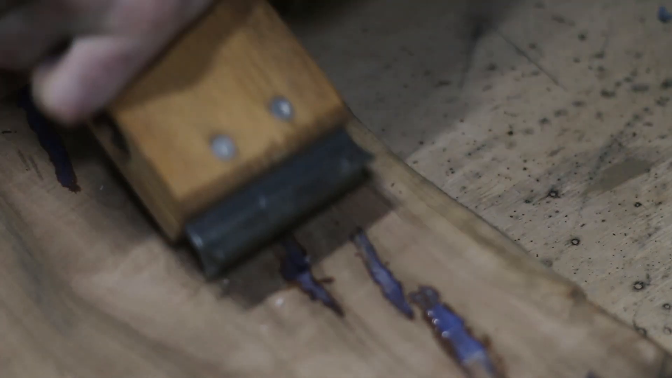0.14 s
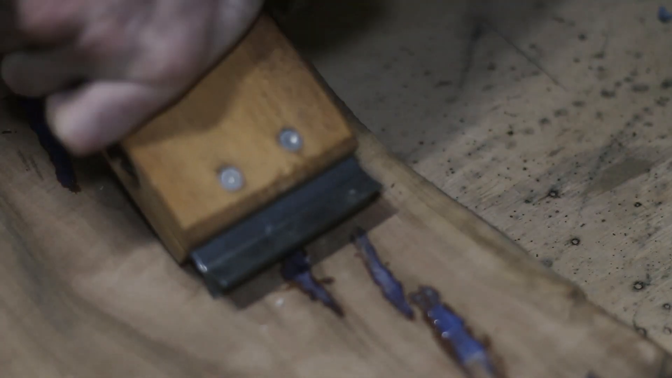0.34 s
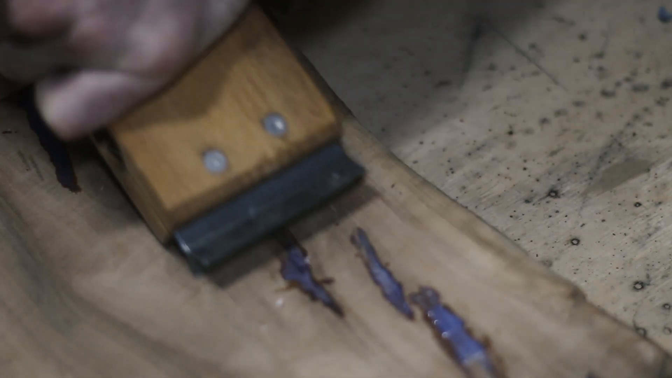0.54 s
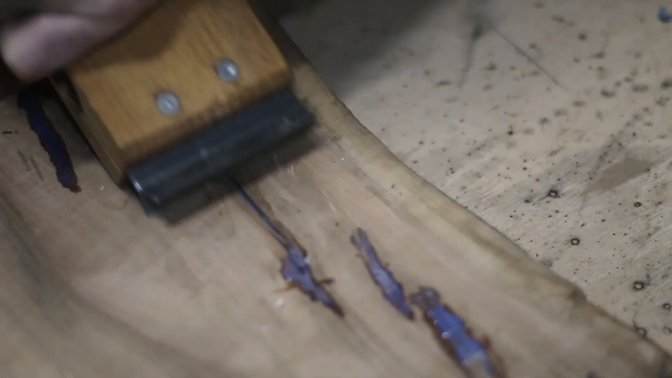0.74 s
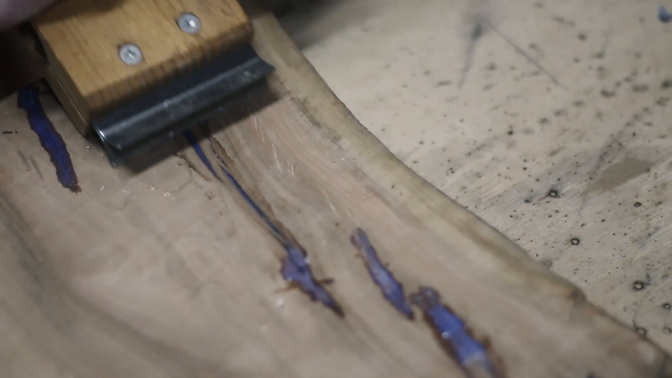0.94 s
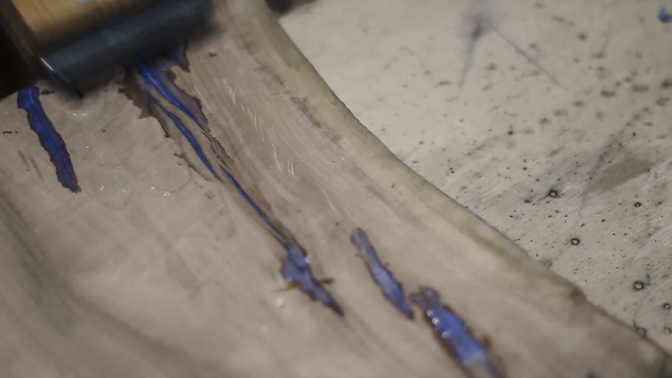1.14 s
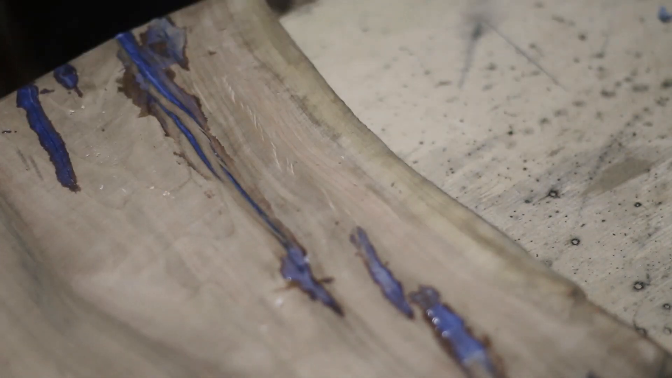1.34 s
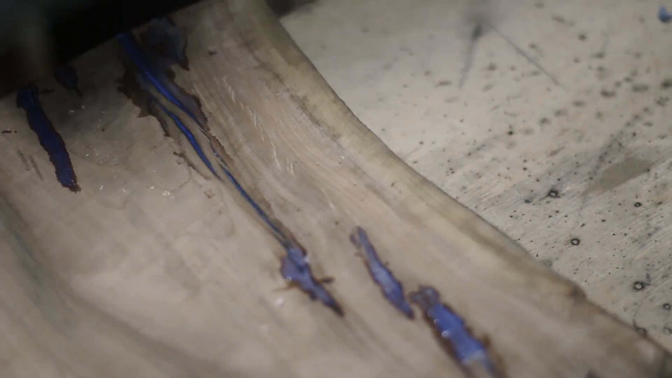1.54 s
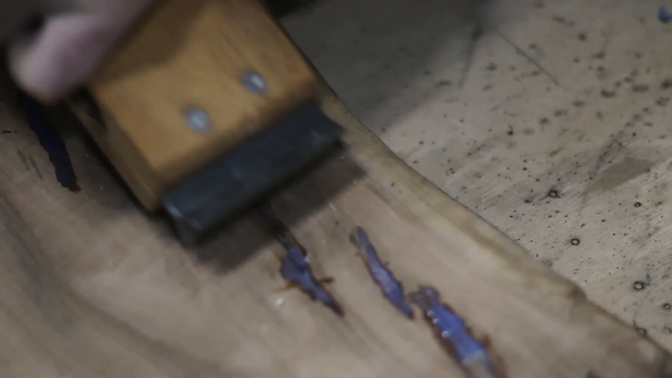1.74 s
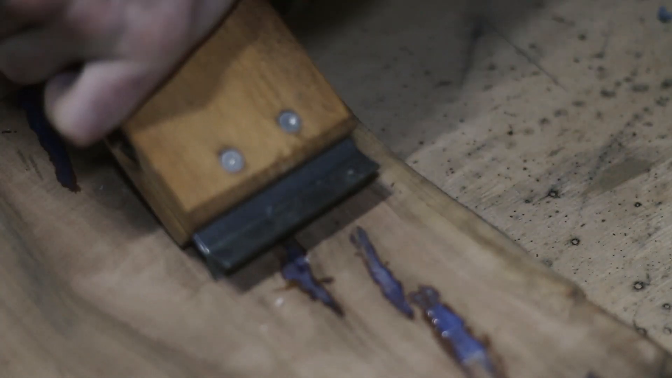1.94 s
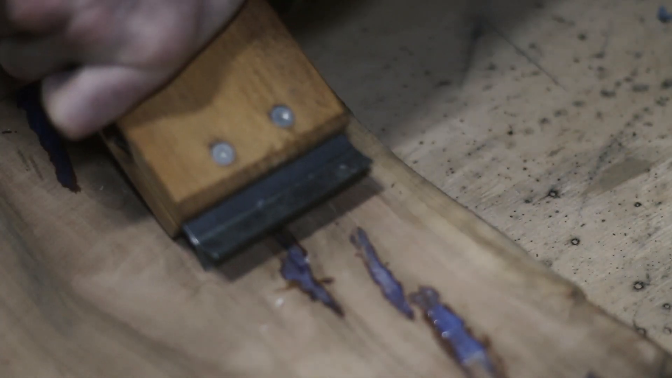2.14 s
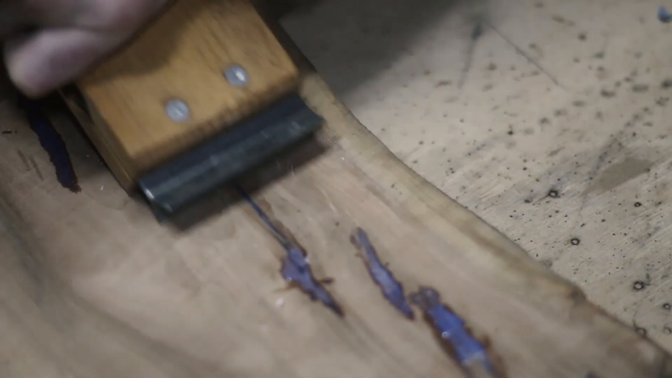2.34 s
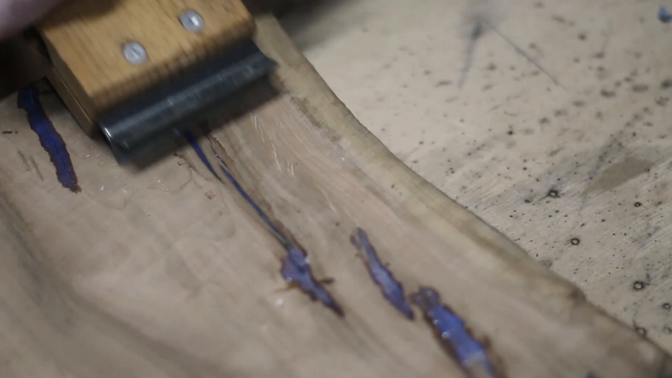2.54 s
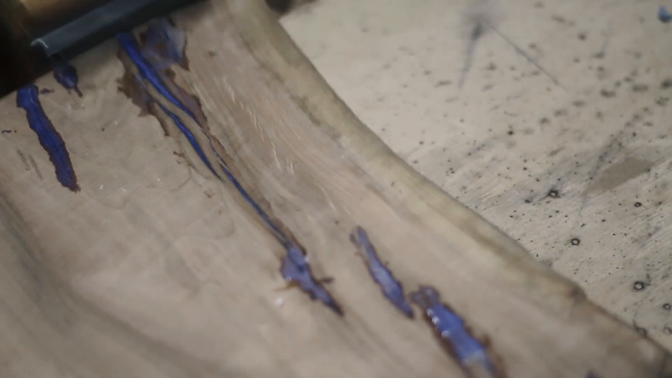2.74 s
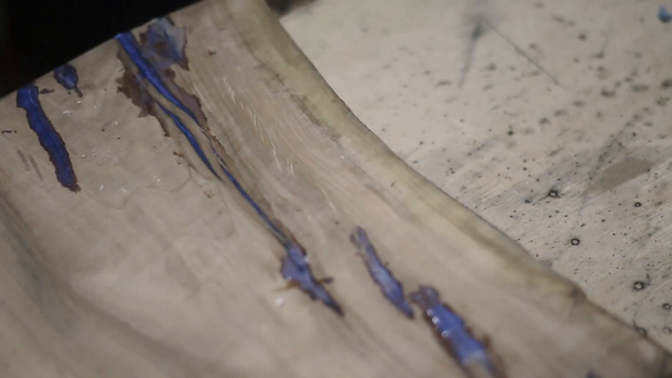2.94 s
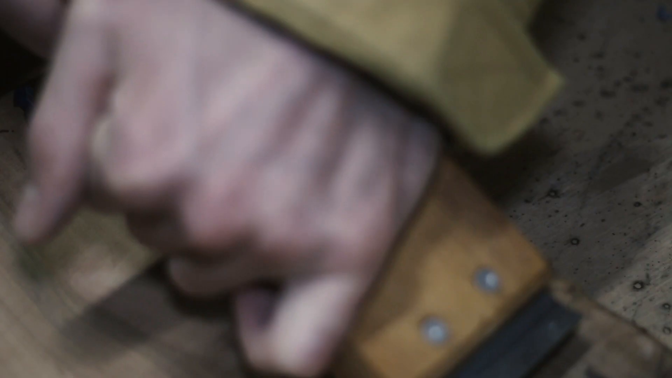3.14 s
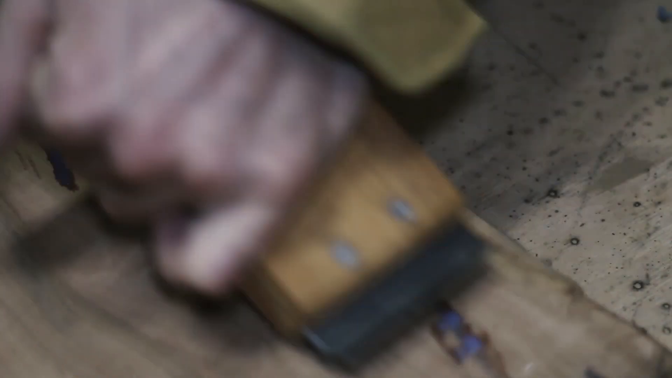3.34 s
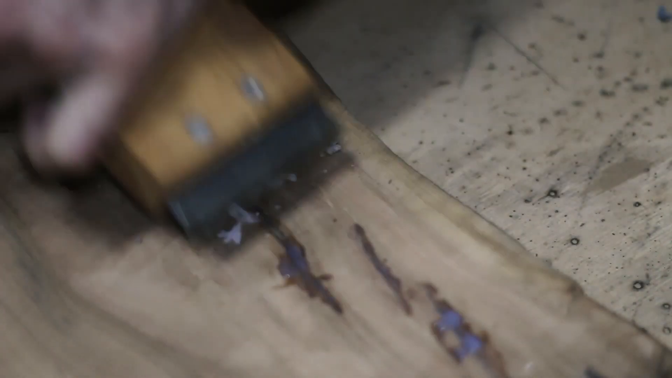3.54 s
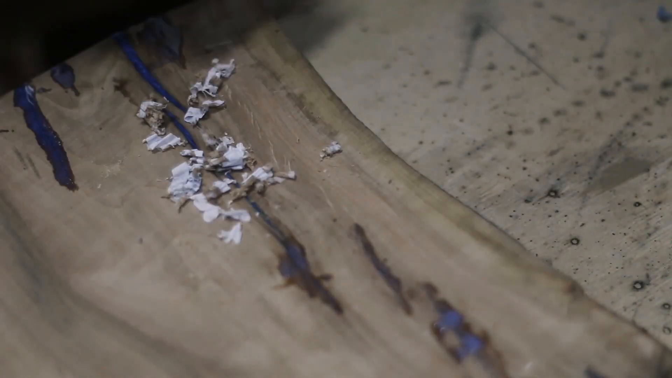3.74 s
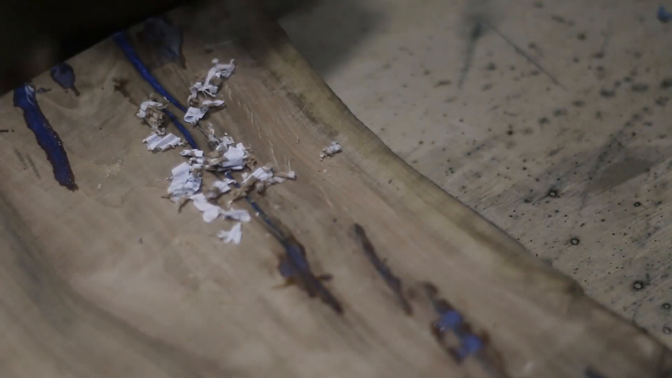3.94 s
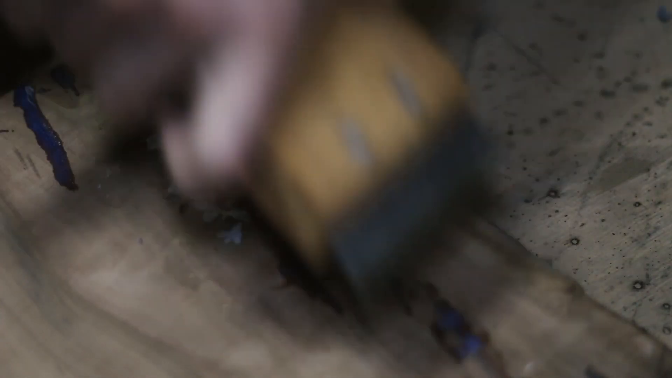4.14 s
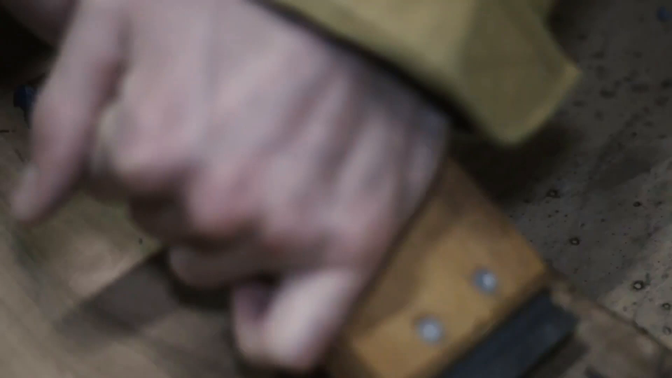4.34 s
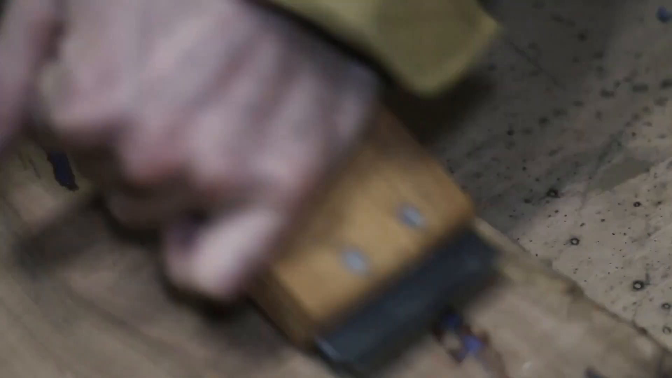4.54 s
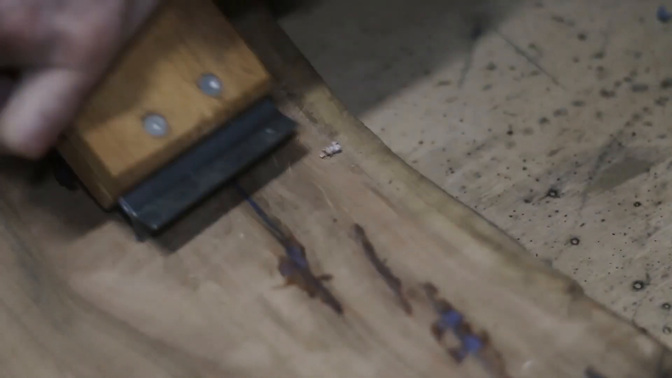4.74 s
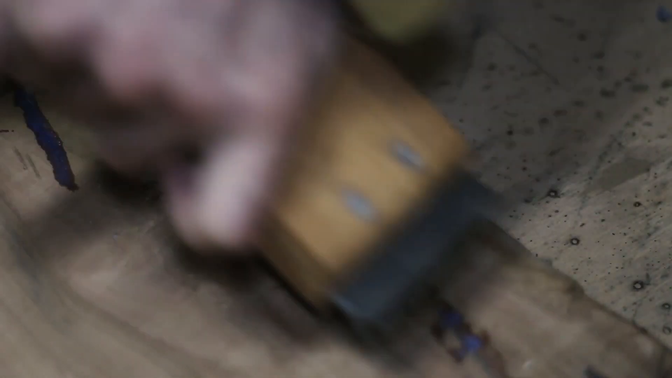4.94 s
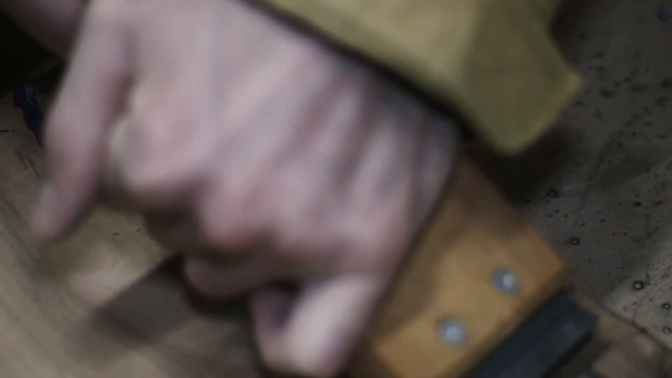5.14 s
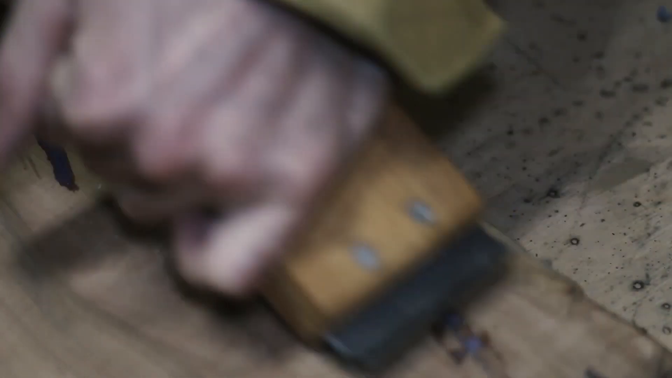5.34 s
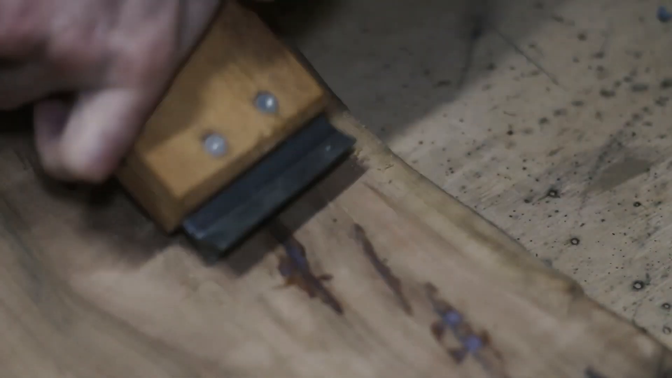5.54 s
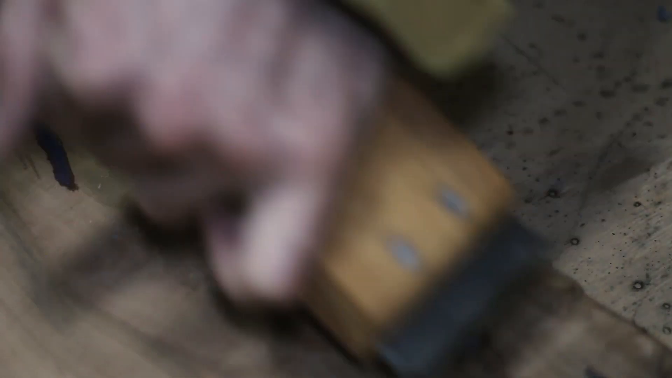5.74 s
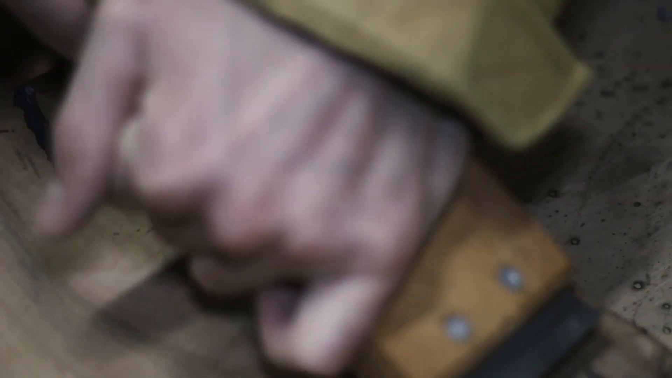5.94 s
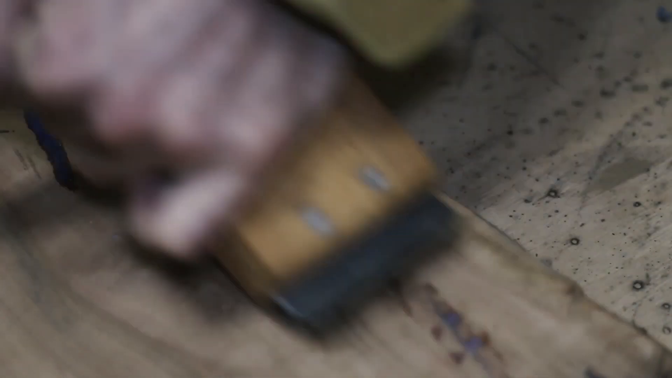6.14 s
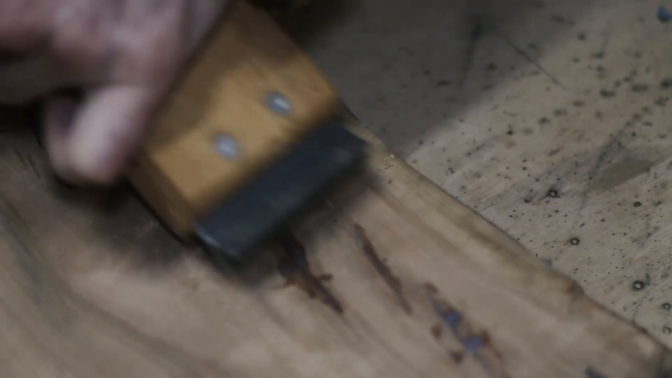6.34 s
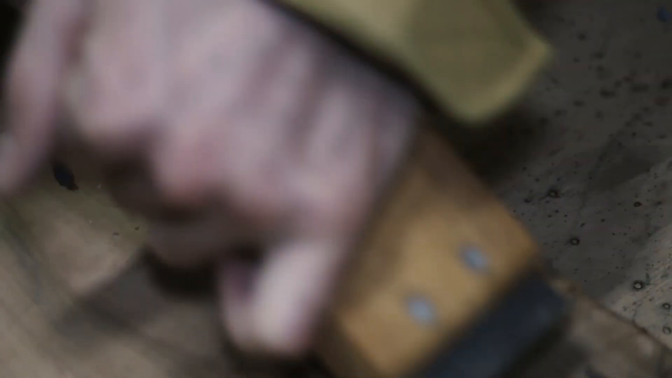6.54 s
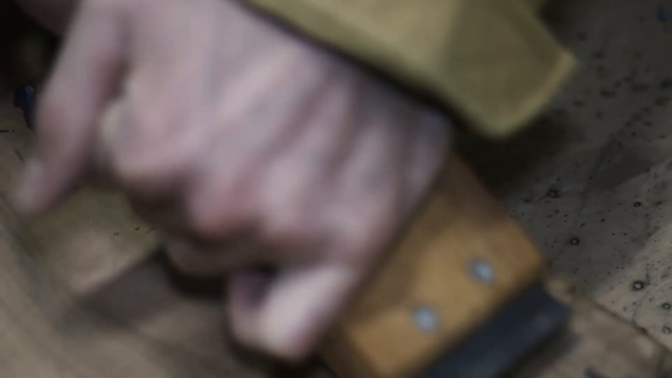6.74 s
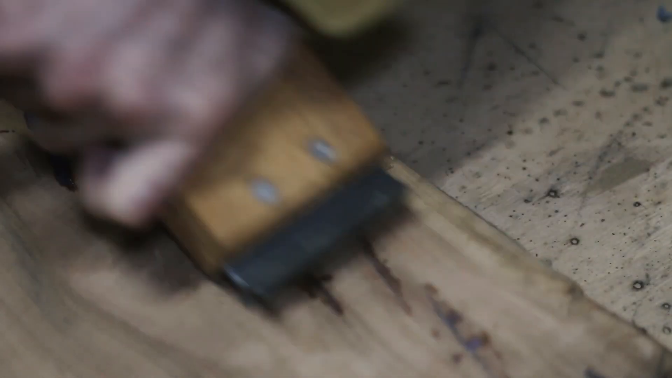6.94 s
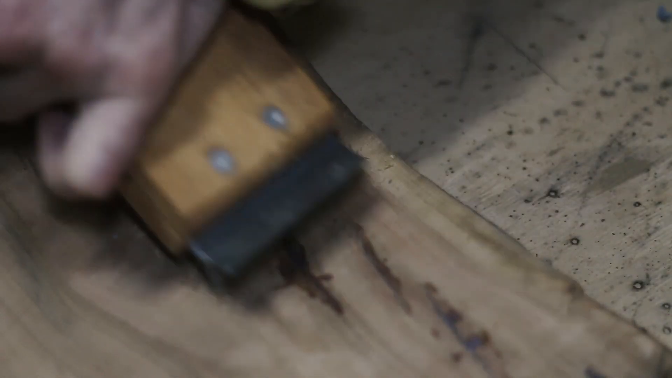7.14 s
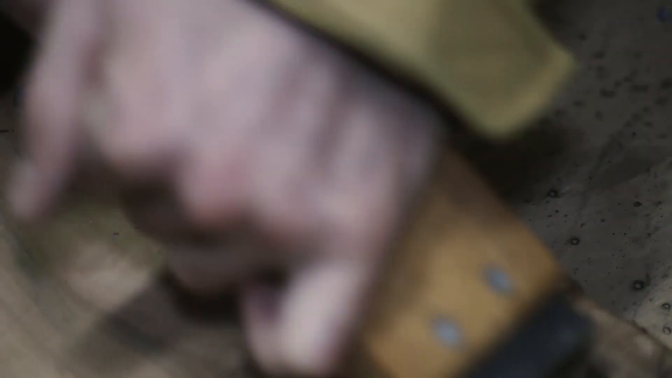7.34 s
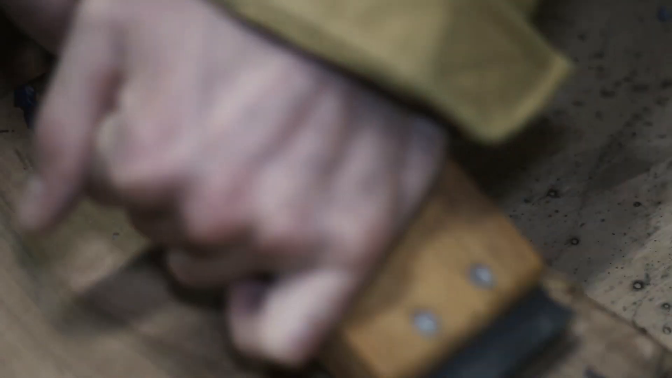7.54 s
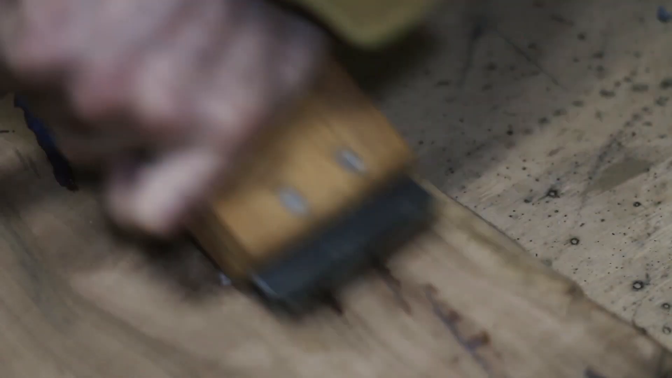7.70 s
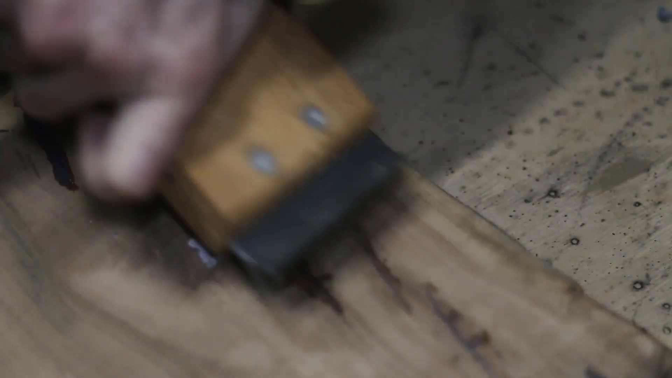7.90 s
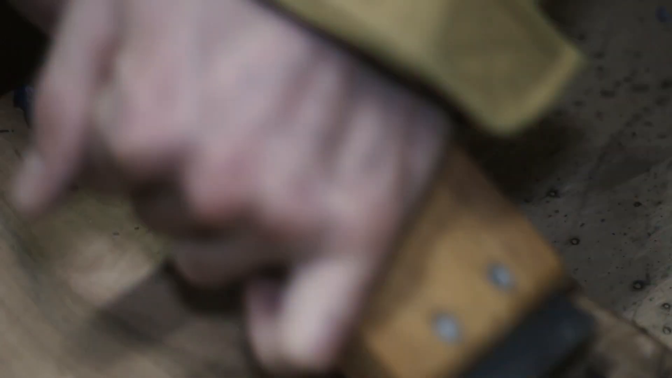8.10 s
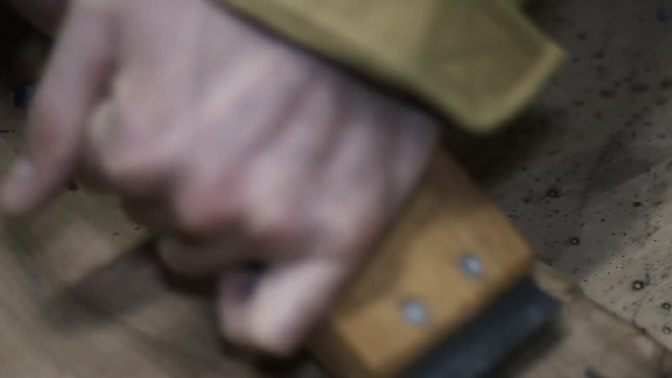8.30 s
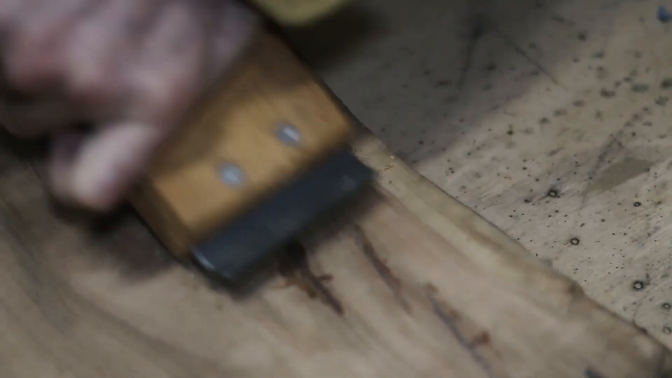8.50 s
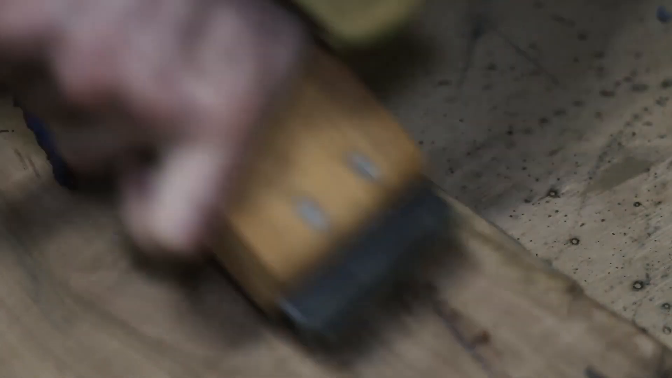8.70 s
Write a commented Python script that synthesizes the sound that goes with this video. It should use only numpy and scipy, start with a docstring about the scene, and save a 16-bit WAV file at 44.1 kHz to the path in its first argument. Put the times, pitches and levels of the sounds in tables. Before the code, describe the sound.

A close stereo take in a quiet workshop, slightly stronger on the right, with low room air and short reverberation. At 0.3 s a steel scraper in a wooden holder clacks onto a board. From 0.6 to 1.3 s it draws a thin, dry rasp, squeaking higher near the end; a snap and a hollow board-on-bench thump with a low boom close it. Cloth rustles softly. A gentler clack at 2.0 s leads to another slow pull from 2.25 s, ending in chatter, a sharp snap and a thump at 2.85 s. At 3.2 s a hard clack starts a quicker, louder, rougher scrape; sleeve and hand rustle around 3.7 s. After a short gap, clacks at 4.4, 5.2, 5.95, 6.75, 7.5 (softer) and 8.25 s each precede a short scrape that swells, catches with a tiny chirp, rings metallically and lifts away. Faint rustle ends it near 8.9 s.

```python
"""A steel scraper blade in a wooden holder is set down on a board with a clack and pulled along the grain.
Two slow pulls run off the end, so the board thumps on the bench; short quick pulls follow.
The pulls are shaped noise through resonances, with bursts of chatter; the blows are dying tones and noise.
Swelling noise makes the rustle of sleeve and hand, and the workshop answers with dying noise."""
import sys
import numpy as np
from scipy import signal
from scipy.fft import rfft, irfft, next_fast_len
from scipy.io import wavfile
from scipy.ndimage import uniform_filter1d

SR = 44100
rng = np.random.default_rng(int(sys.argv[2]) if len(sys.argv) > 2 else 0)


def master(y):
    """Save y as 16-bit WAV."""
    cut = np.clip(np.atleast_2d(y).T, -1, 1)
    pcm = np.round(cut * 32767)  # scale
    wavfile.write(sys.argv[1], SR, pcm.astype(np.int16))


N = 391166
TAIL = SR * 3 // 4  # samples in a blow, and in a stretch of room sound

# Ringing tones of the board, before any extra damping.
# Each row: pitch in Hz, relative level in dB, time to fall by 60 dB in seconds.
BOARD_MODES = [(62.8, -5.5, 0.89), (106.8, -1.5, 0.31), (149.7, -1.5, 0.38), (260, -0.5, 0.23),
               (323.7, 2, 0.23), (392.6, 7.5, 0.2), (523.4, 5.5, 0.11), (675, -0.5, 0.046), (888, 2, 0.061),
               (1028, 2.5, 0.14), (1295, 4.5, 0.12), (1607, 3, 0.068)]


def amp(db):
    """Turn decibels into a plain multiplier."""
    return 10 ** (np.asarray(db) / 20)


def unit(x):
    """Scale a signal to an rms (average strength) of 1."""
    return x / np.sqrt(np.mean(x ** 2) + 1e-20)


def along(points, hz):
    """Read a curve of (Hz, value) points on a log frequency axis."""
    f, v = np.transpose(points)
    return np.interp(np.log(hz + 1), np.log(f + 1), v)


def curves(rows):
    """Draw one value per sample for each column after the time."""
    s, *columns = np.transpose(rows)
    return [np.interp(np.arange(N) / SR, s, column) for column in columns]


def wobble(rate):
    """Join random points, rate of them a second, by straight lines."""
    knots = rng.standard_normal(int(N * rate / SR) + 2)
    return np.interp(np.arange(N) * rate / SR, np.arange(len(knots)), knots)


def filtered(x, response):
    """Multiply the spectrum of x by a response that depends on frequency."""
    n = x.shape[-1]
    padded = next_fast_len(n + SR // 2)
    spectrum = rfft(x, padded) * response(np.fft.rfftfreq(padded, 1 / SR))
    return irfft(spectrum, padded)[..., :n]


def coloured(x, spectrum):
    """Give x the balance of a (Hz, dB) curve and an rms of 1."""
    return unit(filtered(x, lambda hz: amp(along(spectrum, hz))))


def resonances(modes):
    """Add up resonances (Hz, width Hz, dB), each favouring a band, with alternating signs."""
    def response(f):
        return sum((-1) ** k * amp(db) * 1j * f * width / (centre * centre - f * f + 1j * f * width)
                   for k, (centre, width, db) in enumerate(modes))
    return response


def spread(pair, alike):
    """Mix two unrelated signals so that left and right are as alike as asked (1 is the same)."""
    def mid_and_side(hz):
        turn = np.arccos(np.clip(along(alike, hz), -1, 1)) / 2
        return np.array([np.cos(turn), np.sin(turn)])
    mid, side = filtered(pair, mid_and_side)
    return np.array([mid + side, mid - side])


def fibres(grain_db, clump_db):
    """Tearing fibres: noise whose strength varies from grain to grain and comes in clumps."""
    strength = amp(grain_db * wobble(700) + clump_db * wobble(60))
    return strength * rng.standard_normal((2, N))


def ring(modes, t, scatter_db, damping=1):
    """Struck tones that die away, with randomly varied strengths for each blow."""
    return sum(amp(db + scatter_db * rng.standard_normal() - 60 * damping * t / t60)
               * np.sin(2 * np.pi * hz * t) for hz, db, t60 in modes)


def dying(t60s, levels, channels):
    """Noise in which each frequency dies at its own speed, with the given energy per frequency."""
    hz, t, z = signal.stft(rng.standard_normal((channels, TAIL)), SR, nperseg=256)
    fall = amp(-60 * t / along(t60s, hz)[:, None])
    energy = np.sqrt(128 * np.sum(fall ** 2, axis=1, keepdims=True))
    fall = fall * amp(along(levels, hz))[:, None] / energy
    return signal.istft(z * fall, SR, nperseg=256)[1][:, :TAIL]


def rustle():
    """Cloth and skin rub as noise that swells and fades, over the quiet of the workshop."""
    # Movements of sleeve and hand. Each row: loudest moment in seconds, width in seconds,
    # dull part in dB, bright part in dB.
    movements = [(0.0, 0.083, -63, -67), (1.45, 0.22, -60.5, -69), (1.66, .05, -75, -69),
                 (3.67, .04, -58.5, -62), (3.8, .06, -58, -58), (4.07, 0.038, -67.5, -69),
                 (4.32, 0.098, -59.5, -64.5), (5.2, 0.15, -64.5, -68.5), (5.95, 0.15, -64, -70),
                 (6.68, .18, -65, -69.5), (7.44, 0.081, -63, -68), (8.15, .15, -65, -69.5),
                 (8.87, 0.095, -61, -66)]
    # Colours of the dull part, bright part and quiet room. Each row: frequency in Hz, relative level in dB.
    dull_colour = [(120, -49), (200, -22), (273, -3.5), (637, -3.5), (1020, -4), (5000, -15.5), (6500, -41),
                   (11000, -120)]
    bright_colour = [(1500, -37), (2500, -3), (4000, -4.5), (9000, -6), (16000, -19)]
    air_colour = [(15, -43), (25, -7.5), (48, -1.5), (70, -4), (223, -13), (344, -13.5), (427, -19),
                  (5430, -20), (5880, -20), (16000, -30)]
    s, width, dull_db, bright_db = np.transpose(movements)
    swell = 1 / np.cosh((np.arange(N)[:, None] / SR - s) / width)
    dull = swell @ amp(dull_db) * coloured(fibres(grain_db=1, clump_db=1), dull_colour)
    bright = swell @ amp(bright_db) * coloured(fibres(grain_db=1, clump_db=1), bright_colour)
    air = amp(-68) * coloured(rng.standard_normal((2, N)), air_colour)
    return dull + bright + air


def wood_knock():
    """The many small modes of struck wood blur into noise whose frequencies die at different speeds."""
    # Each row: frequency in Hz, time to fall by 60 dB in seconds.
    fall_times = [(100, 0.9), (300, 0.26), (1000, 0.12), (2500, 0.033), (5000, 0.038), (12000, 0.019)]
    # Each row: frequency in Hz, relative level in dB.
    levels = [(40, -15), (250, -4), (1000, -8), (2500, -8.5), (5000, -16.5), (12000, -34)]
    return dying(fall_times, levels, channels=1)[0]


def landings():
    """Setting the blade down clacks the holder and knocks the board into ringing."""
    # Each row: start in seconds, level in dB, hollow note against that level in dB.
    landing_rows = [(0.3363, -22.5, -16), (2.016, -31.5, -15), (3.1974, -17, -17.5), (4.4106, -15.5, -7.5),
                    (5.22, -12, -21.5), (5.9565, -15, -23), (6.7387, -15, -16), (7.5103, -25.5, -5.5),
                    (8.2674, -15, -12)]
    # Tones of the struck holder. Each row: pitch in Hz, relative level in dB, time to fall by 60 dB in seconds.
    clack_modes = [(1820, -6, 0.014), (2650, 8.5, 0.0046), (3550, -3, 0.0077), (4520, -1.5, 0.0043),
                   (5540, 0.5, 0.0021), (6920, -13.5, 0.0068)]
    knock_full_db, knock_grows = -30.5, 0.6  # knock setting at a -17 dB landing; dB per dB of landing
    hand_thud_db = -41.5  # low thud of the hand's weight, the same at every landing
    low, hollow, high = BOARD_MODES[:3], BOARD_MODES[3:4], BOARD_MODES[4:]
    out, t = np.zeros(N + SR), np.arange(TAIL) / SR
    for s, db, hollow_db in landing_rows:
        knock_db = knock_full_db + knock_grows * (db + 17) - db
        thud_db = hand_thud_db - db
        clack = ring(clack_modes, t, scatter_db=1.5) * (1 - np.exp(-t / 0.0003)) ** 2
        notes = ring(high, t, scatter_db=3, damping=2.5)
        knock = amp(-15.5) * notes + amp(42) * wood_knock()
        note = ring(hollow, t, scatter_db=0, damping=1.5)
        thud = ring(low, t, scatter_db=1, damping=1.01)
        wood = amp(knock_db) * knock + amp(hollow_db) * note + amp(thud_db) * thud
        wood = wood * (1 - np.exp(-t / 0.0014))  # wood starts more softly than the clack
        out[round(s * SR):][:TAIL] += amp(db - 1.5) * (clack / np.abs(clack).max() + wood)
    return out


def snaps():
    """Fibres and chips snap: a short tone with a little noise that falls 60 dB in 8.9 ms."""
    # Each row: start in seconds, level in dB, pitch in Hz.
    snap_rows = [(0.5484, -62, 6500), (1.2694, -22, 6120), (1.5686, -60, 2050), (2.7304, -16.5, 4960),
                 (3.439, -18.5, 2930), (3.9535, -47, 2290), (6.198, -33, 2820), (6.315, -27, 5200)]
    out, t = np.zeros(N + SR), np.arange(TAIL) / SR
    for s, db, hz in snap_rows:
        tone = np.sin(2 * np.pi * hz * t)
        noise = 0.12 * rng.standard_normal(TAIL)
        out[round(s * SR):][:TAIL] += amp(db - 60 * t / 0.0089) * (tone + noise)
    return out


def slow_pull(pull):
    """Rows (s, rasp, board, hiss, blade dB): the board's rumble grows as the edge travels."""
    board_start_db, board_grows = -10.5, 4.8  # against the rasp level; dB per second after the start
    start = pull[0][0]
    return [(s, rasp_db, board_start_db + board_grows * (s - start), hiss_db, blade_db)
            for s, rasp_db, hiss_db, blade_db in pull]


def quick_pull(start, full, catch, bite, lift, release, start_db, push_db, glide_db, lift_db, ring_db, hiss_db):
    """Rows (s, rasp, board, hiss, blade dB): the edge speeds up, catches, skips, rings, glides on and lifts."""
    slip_s, ring_s, ring_fade_s = 0.006, 0.065, 0.035  # edges of the skip; the ring holds, then fades
    slip_db, release_db = -3.5, -25.5  # change during the skip; rasp change after the lift
    # Board rumble, hiss and blade ring stand against the rasp level.
    board_start_db, board_push_db, board_catch_db, board_glide_db = 0.8, -5, -13, -10
    hiss_start_db, hiss_push_db, hiss_catch_db = -12.5, -7, -11
    hiss_skip_db, hiss_lift_db, hiss_end_db = -4, -4.5, -28
    blade_quiet_db = -13
    ring_catch_db = -3  # against the full ring
    glide = min(bite + ring_s, lift - ring_fade_s - 0.01)
    skip = (glide_db + slip_db, board_glide_db, hiss_skip_db, ring_db + slip_db)
    return [(start, start_db, board_start_db, hiss_start_db, blade_quiet_db),
            (full, push_db, board_push_db, hiss_push_db, blade_quiet_db),
            (catch, push_db, board_catch_db, hiss_catch_db, ring_db + ring_catch_db),
            (catch + slip_s, *skip),
            (max(bite - slip_s, catch + slip_s), *skip),
            (bite, glide_db, board_glide_db, hiss_skip_db, ring_db),
            (glide, glide_db, board_glide_db, hiss_db, ring_db),
            (glide + ring_fade_s, (glide_db + lift_db) / 2, board_glide_db, hiss_db, blade_quiet_db),
            (lift, lift_db, board_glide_db, hiss_lift_db, blade_quiet_db),
            (lift + release, lift_db + release_db, board_glide_db, hiss_end_db, blade_quiet_db)]


def strokes():
    """List all pulls as rows (s, rasp, board, hiss, blade dB)."""
    # One list of rows per slow pull. Each row: time in seconds, rasp level in dB,
    # hiss against the rasp level in dB, blade ring against the rasp level in dB.
    slow_rows = [
        [(.57, -61.5, -8, -10), (.61, -41.5, -2.5, -12), (.72, -42, -6, -9), (.82, -37, -4.5, -6),
         (.87, -38, -5, -2.5), (.89, -38.5, -13, -2.5), (1.03, -39.5, -9, -2.5), (1.085, -40, -14, -2.5),
         (1.106, -39.5, -0.5, -2), (1.2, -38, -3.5, 2), (1.275, -39, 0.5, -12), (1.3, -64, -10, -10)],
        [(2.18, -71, -7, -8), (2.268, -41.5, -7.5, -10.5), (2.42, -40.5, -8.5, -4.5), (2.465, -37, -4.5, -2.5),
         (2.5, -39, -3, -.6), (2.53, -41.5, -20, -1.5), (2.62, -36.5, -10, -5.5), (2.73, -39.5, -13, -0.5),
         (2.78, -38.5, 4.5, 0.5), (2.848, -36, 2.3, -27), (2.87, -57, -3, -18)],
    ]
    # Quick pulls. Each row: edge starts, reaches full speed, catches and skips, bites again, lifts
    # (all in seconds), time to leave the wood in seconds, rasp in dB at the start, up to the catch,
    # after it and at the lift, then blade ring and hiss after the catch in dB against the rasp level.
    quick_rows = [(3.291, 3.339, 3.444, 3.468, 3.625, .045, -61, -32.5, -35, -40, -2.5, -6),
                  (4.47, 4.589, 4.62, 4.645, 4.815, .09, -53, -35, -33.5, -40.5, -1.5, -1.2),
                  (5.275, 5.388, 5.424, 5.446, 5.63, .1, -54, -31.5, -35.5, -44, .6, -1.2),
                  (5.994, 6.124, 6.163, 6.2, 6.37, .09, -56, -31.5, -37, -38.5, 3, -0.5),
                  (6.759, 6.892, 6.922, 6.955, 7.12, .1, -53.5, -32.5, -36, -41.5, -0.3, 1),
                  (7.54, 7.696, 7.714, 7.745, 7.89, .095, -50, -31, -36.5, -37.5, 1, -0.7),
                  (8.315, 8.4, 8.452, 8.465, 8.635, .075, -49, -34.5, -32.5, -38, -4, -2.5)]
    return [slow_pull(pull) for pull in slow_rows] + [quick_pull(*row) for row in quick_rows]


def patchy(x, patchy_db):
    """The colour shifts as the edge meets new grain: random gain in patches of time and frequency."""
    z = signal.stft(x, nperseg=512)[2]
    field = rng.standard_normal(z.shape[1:])
    field = uniform_filter1d(field, size=8, axis=0)  # smooth across frequency
    field = uniform_filter1d(field, size=7, axis=1)  # smooth across time
    return signal.istft(z * amp(patchy_db * unit(field)), nperseg=512)[1][:, :N]


def pulls():
    """The edge tears fibres into the resonances of blade, holder and board."""
    # Colours of rasp and hiss. Each row: frequency in Hz, relative level in dB.
    rasp_colour = [(600, -23), (900, -9), (1800, -1), (2350, 5.5), (3500, 7), (6000, -0.5), (9000, -9),
                   (12000, -16.5), (16000, -120)]
    hiss_colour = [(3000, -19.5), (5000, -3.5), (8000, -3.5), (11000, -14), (16000, -23.5)]
    # Resonances of the holder. Each row: centre in Hz, width in Hz, relative level in dB.
    holder_modes = [(1239, 48, -7), (1460, 45, -7.5), (1854, 207, -8.5), (2146, 29, -6), (4040, 66, -13),
                    (4500, 450, -18.5), (4940, 117, -8.5), (5930, 40, -9), (6630, 47, -15),
                    (8300, 100, -46)]
    # Blade edge held lightly in the slow pulls, pressed hard in the quick ones; the response is squared below.
    # Each row: centre in Hz, width in Hz and relative level in dB before squaring.
    light_modes = [(2550, 200, 0.5), (2900, 280, 1), (3265, 92, -1), (4370, 210, -9)]
    hard_modes = [(2777, 177, 3.5), (3277, 170, 2), (4850, 150, -8)]
    # Near sound. Each row: frequency in Hz, left-right likeness.
    near_alike = [(100, 1), (300, 0.98), (640, 0.93), (1400, 0.66), (3100, 0.52), (6800, 0.75),
                  (15000, 0.072)]
    quick_from = 3.0  # seconds
    all_pulls = strokes()
    rasp_db, board_db, hiss_db, blade_db = curves(np.concatenate(all_pulls))
    t = np.arange(N) / SR
    touching = sum((t > p[0][0]) * (t < p[-1][0]) * 1.0 for p in all_pulls)
    contact = uniform_filter1d(touching, size=1200)  # soft edges, 27 ms long

    tearing = fibres(grain_db=2, clump_db=1.5)
    holder = unit(filtered(tearing[::-1], resonances(holder_modes)))
    rasp = amp(-5.5) * coloured(tearing, rasp_colour) + amp(-5.5) * holder
    hiss = coloured(fibres(grain_db=1.5, clump_db=1.5), hiss_colour)
    edge = patchy(rasp + amp(hiss_db) * hiss, patchy_db=1.6)

    biting = fibres(grain_db=1, clump_db=4)
    light, hard = (unit(filtered(biting, lambda hz: resonances(modes)(hz) ** 2))
                   for modes in (light_modes, hard_modes))
    blade = np.where(t < quick_from, light, hard)

    # The pressing hand damps the board, which widens its resonances.
    damped_wood = [(hz, 3.2 / t60 + 12, db) for hz, db, t60 in BOARD_MODES]
    board = unit(filtered(fibres(grain_db=2.5, clump_db=2), resonances(damped_wood)))
    steady = contact * amp(rasp_db) * (edge + amp(board_db) * board + amp(blade_db) * blade)
    return spread(steady + chatter(), near_alike)


def chatter():
    """The edge sticks and slips: an unsteady oscillation, slow noise carried on a gliding pitch."""
    # Each row: start in seconds, length in seconds, first pitch in Hz, last pitch in Hz, level in dB.
    bursts = [(1.09, 0.067, 3014, 3100, -34.5), (1.149, 0.061, 2100, 1990, -32),
              (1.196, 0.032, 2380, 3710, -30.5), (1.231, 0.054, 5760, 6118, -39),
              (2.683, 0.1, 2900, 3090, -38), (2.758, 0.044, 3284, 4780, -32),
              (2.805, 0.052, 5830, 6230, -41), (3.385, 0.03, 1811, 3586, -27), (3.43, .02, 2504, 5030, -29),
              (4.604, 0.023, 3000, 4805, -27.5), (4.641, 0.018, 3200, 3346, -27.5),
              (4.81, 0.036, 2720, 2608, -34.5), (5.4, .03, 1484, 2543, -33.5),
              (5.445, 0.015, 2883, 2886, -32), (6.152, .02, 2866, 3460, -32),
              (6.196, 0.011, 2900, 2900, -28.5), (6.91, 0.017, 4950, 4950, -33),
              (6.951, 0.021, 5110, 4990, -32.5), (7.656, 0.038, 1302, 1596, -44),
              (7.708, 0.017, 4900, 5195, -27.5), (7.74, 0.017, 5300, 6800, -34),
              (8.452, 0.052, 4700, 4950, -40)]
    pitch, level = np.zeros(N), np.zeros(N)
    for s, length, first_hz, last_hz, db in bursts:
        u = np.arange(round(length * SR)) / (length * SR)  # runs from 0 to 1 through the burst
        pitch[round(s * SR):][:len(u)] = first_hz + (last_hz - first_hz) * u
        level[round(s * SR):][:len(u)] = amp(db) * np.sin(np.pi * u) ** 0.5
    sway = unit(filtered(fibres(grain_db=2, clump_db=2.5), lambda hz: 1 / (1 + (hz / 480) ** 2)))
    phase = 2 * np.pi * np.cumsum(pitch) / SR
    opposite = np.array([[1], [-1]])
    return level * (opposite * sway * np.cos(phase) + sway[::-1] * np.sin(phase))


def thumps():
    """The board drops on the bench, rocks to rest in small contacts and makes the bench frame boom."""
    # Each row: start in seconds, level in dB, rattle against that level in dB, boom in dB,
    # damping as a multiple of the normal rate of dying.
    thump_rows = [(1.278, -17, -11, -25.5, 1.5), (2.847, -18.5, -12.5, -25, 1.92)]
    # Tones of bench top and bench frame, before that damping.
    # Each row: pitch in Hz, relative level in dB, time to fall by 60 dB in seconds.
    bench_modes = [(278, -0.5, 0.15), (337.6, -5, 0.14), (429, -6, 0.15), (573, -12.5, 0.15)]
    frame_modes = [(104.2, 5, 0.63), (150.3, 2, 0.71)]
    out, t = np.zeros(N + SR), np.arange(TAIL) / SR
    for s, db, rattle_db, boom_db, damping in thump_rows:
        contacts = np.zeros(TAIL)
        # The board rocks to rest within a tenth of a second.
        contacts[rng.integers(0, SR // 10, size=24)] = amp(rattle_db) * rng.standard_normal(size=24)
        contacts = filtered(contacts, lambda hz: 1 / (1 + 1j * hz / 900) ** 2)  # soft contacts
        contacts[0] += 1  # the main blow
        body = ring(bench_modes, t, 0, damping) + amp(41) * wood_knock()
        body = body * (1 - np.exp(-t / 0.0006))
        out[round(s * SR):][:TAIL] += amp(db - 9.5) * signal.fftconvolve(contacts, body)[:TAIL]
        slow_start = (1 - np.exp(-t / 0.039)) ** 2  # the frame is slow to take up the blow
        out[round(s * SR):][:TAIL] += amp(boom_db) * ring(frame_modes, t, 0, damping) * slow_start
    return out


def blows():
    """Landings, snaps and thumps, each repeated by reflections off bench top and near walls."""
    # Each row: delay in seconds, level against the direct sound in dB.
    echo_rows = [(.0035, -21), (.006, -17), (.009, -20.5), (.013, -25.5)]
    out = landings() + snaps() + thumps()
    echoes = sum(amp(db) * np.roll(out, round(delay * SR)) for delay, db in echo_rows)
    return (out + echoes)[:N]


def shop(x):
    """The room's answer: dying noise, drawn afresh for every 0.75 s stretch of sound."""
    # Each row: frequency in Hz, time to fall by 60 dB in seconds.
    fall_times = [(100, 0.8), (400, 0.28), (1500, 0.66), (5000, 0.41), (12000, 0.39)]
    # Strength of the room's answer. Each row: frequency in Hz, level in dB.
    room_levels = [(100, -8.5), (1000, -4), (4000, -10), (12000, -9)]
    out = np.zeros((2, N + 2 * SR))
    for start in range(0, N, TAIL):
        answer = dying(fall_times, room_levels, channels=2)
        wet = signal.fftconvolve(x[None, start:start + TAIL], answer, axes=1)
        out[:, start + 200:][:, :wet.shape[1]] += wet  # the room answers 200 samples later
    return out[:, :N]


def scene():
    """Tool and blows are close by; room and rustle arrive from all sides."""
    # Far sound. Each row: frequency in Hz, left-right likeness.
    far_alike = [(100, 0.87), (300, 0.94), (640, 0.84), (1400, 0.57), (3100, 0.13), (6800, 0)]
    tool, hits = pulls(), blows()
    room = shop(tool.mean(axis=0) + amp(1) * hits)
    return tool + hits + spread(room + rustle(), far_alike)


def record(dry):
    """The right microphone is nearer the work; the bass rolls off and nothing is kept above the band limit."""
    # Each row: frequency in Hz, left minus right in dB.
    lean = [(60, -4.5), (400, -2.5), (1000, -2), (2000, -4.5), (2900, -5), (4000, -3), (8000, -3),
            (13000, .7)]
    top_hz, bass_hz = 15800, 45

    def response(hz):
        sides = amp(np.array([[0.5], [-0.5]]) * along(lean, hz))
        bass = (1j * hz / (bass_hz + 1j * hz)) ** 2
        return sides * bass * (hz < top_hz)
    return filtered(dry, response)


dry = scene()
out = record(dry)
master(out)
```